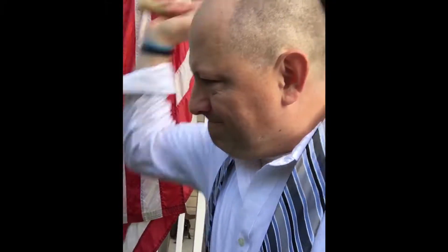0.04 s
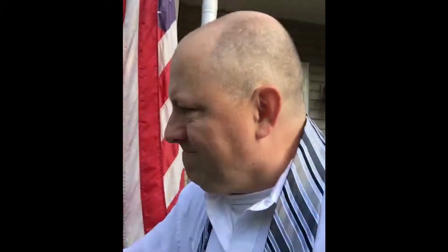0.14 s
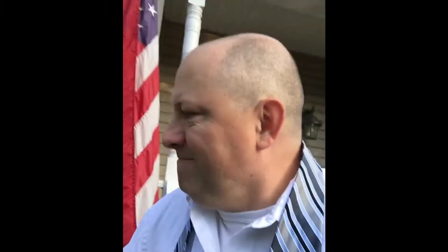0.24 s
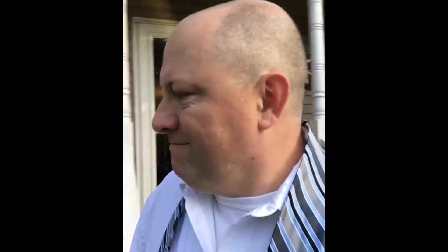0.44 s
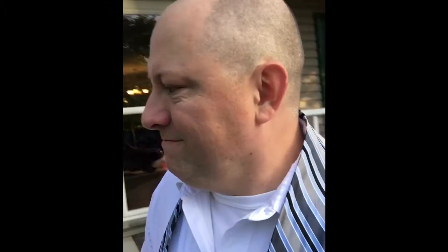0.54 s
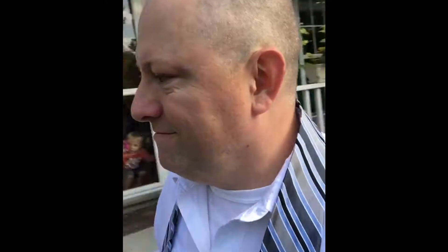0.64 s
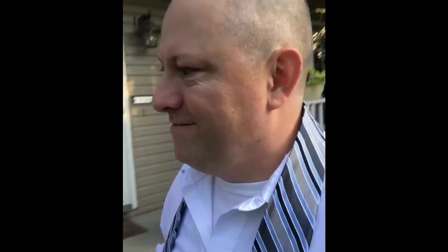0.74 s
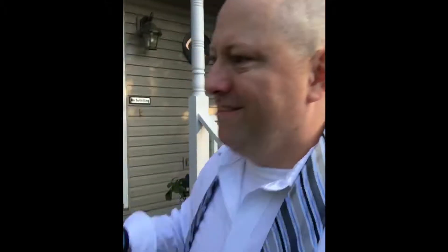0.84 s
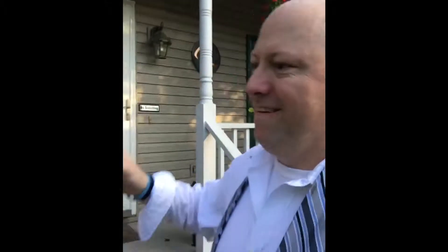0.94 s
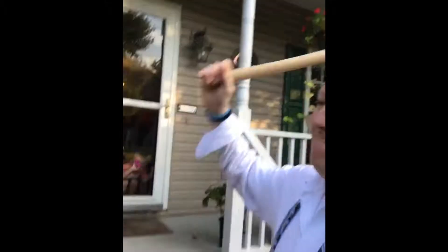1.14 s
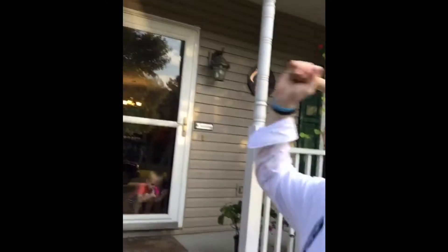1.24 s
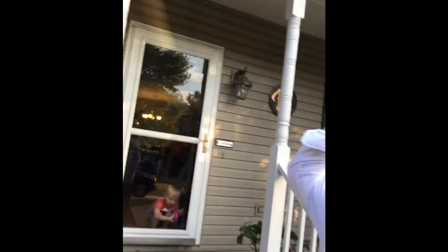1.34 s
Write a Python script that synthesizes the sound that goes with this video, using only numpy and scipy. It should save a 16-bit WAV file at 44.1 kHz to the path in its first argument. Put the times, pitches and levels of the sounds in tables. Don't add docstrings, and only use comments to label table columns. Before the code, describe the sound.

A wooden handle smacks a metal canister with a ringing crack and gas burst, crickets behind

```python
import sys
import numpy as np
from scipy import signal
from scipy.io import wavfile
from scipy.ndimage import uniform_filter1d

SR = 44100
rng = np.random.default_rng(int(sys.argv[2]) if len(sys.argv) > 2 else 0)


def store_pcm(level_fs):
    pcm = np.round(np.clip(level_fs, -1, 1) * 32767).astype(np.int16)
    wavfile.write(sys.argv[1], SR, np.atleast_2d(pcm).T)


def volts(x):
    e = np.asarray(x, float) / 20
    return 10 ** e


N = 61739
BLOW_S = 0.2148


def evened(x):
    return x / np.sqrt(np.mean(x ** 2) + 1e-20)


def colour(x, points):
    curve_hz, curve_db = np.transpose(points)
    hz = np.abs(np.fft.fftfreq(8192, 1 / SR))
    log_gain = np.interp(np.log(hz + 1), np.log(curve_hz + 1), curve_db) * np.log(10) / 20
    taps = np.fft.ifft(np.exp(np.conj(signal.hilbert(log_gain)))).real[:4096]
    return signal.oaconvolve(x, taps / np.linalg.norm(taps))[:len(x)]


def resonate(x, hz, width):
    r = np.exp(-np.pi * width / SR)
    return signal.lfilter([1, 0, -1], [1, -2 * r * np.cos(2 * np.pi * hz / SR), r * r], x)


def add(mix, s, sound):
    part = mix[max(round(s * SR), 0):][:len(sound)]
    part += sound[:len(part)]


def burst(start, rise, hold, t60):
    t = np.arange(N) / SR - start
    return np.clip(t / rise, 0, 1) * volts(-60 * np.maximum(t - rise - hold, 0) / t60)


def crackle(per_s, spread_db):
    chance = rng.random(N)
    size = rng.exponential(1, N)
    sign = rng.choice([-1., 1.], N)
    return evened((chance < per_s / SR) * sign * volts(spread_db * np.minimum(size, 4)))


def flutter(smooth_s, depth_db):
    width = int(smooth_s * SR)
    drift = uniform_filter1d(uniform_filter1d(rng.standard_normal(N), width), width)
    return volts(depth_db * evened(drift))


def cricket():
    singles = [.0, 0.058, 0.121, 0.137, .196, 0.809, 0.831, .977, .997, 1.122, 1.353]
    pairs = [0.022, 0.08, 0.154, .328, 0.38, 0.433, 0.471, 0.621, 0.715, .903, 0.944, 1.146, 1.184, 1.219,
             1.258, 1.373]
    triples = [0.509, 0.566, 0.662, 0.751, 0.851, 1.016, 1.071, 1.301]
    # time_s, level_db
    loudness = [(0, -55), (.2, -55), (.5, -54), (.6, -50), (.72, -48.5), (.8, -54), (1.1, -53), (1.4, -54)]
    stroke_s, stroke_gap_s, stroke_spread_db = .011, .0165, 1.3
    top_hz, slide_hz = 7480, 760
    chorus_hz, chorus_width_hz, chorus_db = 7180, 1430, -56.5

    out = np.zeros(N)
    t = np.arange(0, stroke_s, 1 / SR)
    shape = np.sin(np.pi * (t / stroke_s) ** 0.9) ** 2
    starts = []
    for strokes, groups in enumerate([singles, pairs, triples], 1):
        starts += [s + k * stroke_gap_s for s in groups for k in range(strokes)]
    for s, (a, b, c) in zip(starts, rng.standard_normal((len(starts), 3))):
        hz = top_hz + 60 * a - slide_hz * t / stroke_s
        tone = np.sin(2 * np.pi * (np.cumsum(hz) / SR + c))
        add(out, s - .0012, shape * volts(stroke_spread_db * b) * tone)
    out *= 2 * volts(np.interp(np.arange(N) / SR, *np.transpose(loudness)))

    far = rng.standard_normal(N)
    for _ in range(3):
        far = resonate(far, chorus_hz, chorus_width_hz)
    leaves = rng.standard_normal(1300) * volts(-60 * np.arange(1300) / SR / .04)
    blur = signal.oaconvolve(out, leaves / np.linalg.norm(leaves))[:N] / np.sqrt(10)
    return out + blur + volts(chorus_db) * evened(far)


def evening():
    # pitch_hz, level_db (per Hz)
    rumble_tone = [(11, -26), (18, -12.5), (43, 8), (92, -6.5), (124, -3.5), (194, -18), (239, -15.5),
                   (500, -28.5), (650, -74), (1100, -120)]
    air_tone = [(180, -23), (300, -18.5), (1000, -7), (2610, -9), (4700, -13.5), (5800, -32), (7080, -12),
                (8300, -10), (9390, -70), (11100, -16.5), (16000, -16)]
    rumble_db, air_db = -53, -61.5
    wind = evened(colour(rng.standard_normal(N), rumble_tone + [(900, -69)])) * flutter(0.051, 1.0)
    air = evened(colour(rng.standard_normal(N), air_tone))
    return volts(rumble_db) * wind + volts(air_db) * air


def grip():
    # start_s, peak_db, brightness (dB per octave)
    snaps = [
        (.0761, -27.5, 3.5),
        (.12155, -17, 0),
        (.1274, -27, 10),
        (.1304, -34, 2),
    ]
    # pitch_hz, level_db, t60_s
    grip_tones = [(1870, -10, .008), (2620, 0, .0075), (2950, -8, .006), (4200, -6, .007), (5600, -8, .003),
                  (7200, -8, .003), (12000, -15, .002)]
    out = np.zeros(N)
    t = np.arange(1500) / SR
    spreads = rng.standard_normal((len(snaps), 2 * len(grip_tones)))
    grits = rng.standard_normal((len(snaps), len(t)))
    for (s, db, tilt), spread, grit in zip(snaps, spreads, grits):
        ring = np.zeros(len(t))
        for (hz, level_db, t60), a, b in zip(grip_tones, spread[::2], spread[1::2]):
            fade = volts(level_db + tilt * np.log2(hz / 2600) + a - 60 * t / t60)
            ring += fade * np.cos(2 * np.pi * hz * (1 + .01 * b) * t - .5)
        tail_tone = [(1000, -20), (2600, 0), (4000, tilt - 4), (13000, 2 * tilt - 8)]
        tail = volts(-25 - 60 * t / .03) * colour(grit, tail_tone)
        add(out, s, volts(db) * (ring / np.abs(ring).max() + tail))
    return signal.lfilter(*signal.butter(3, 1400, 'high', fs=SR), out)


def swing():
    # time_s, pitch_hz, hum_db, swish_db
    path = [
        (.135, 108.9, -92, -60),
        (0.161, 110, -34, -56),
        (.167, 112, -58, -50),
        (0.175, 106, -30, -43),
        (0.201, 141.3, -30, -45),
        (0.219, 127.6, -42.5, -29),
        (0.226, 139, -33.5, -34),
        (0.244, 130, -108, -73),
    ]
    # pitch_hz, level_db (per Hz)
    swish_tone = [(290, -4), (500, -3), (740, -7), (2730, -4.5), (6230, -17.5), (7000, -17), (16000, -17.5)]
    s, hz, hum_db, swish_db = np.transpose(path)
    t = np.arange(N) / SR
    turns = np.cumsum(np.interp(t, s, hz)) / SR + 0.33
    hum = np.sin(2 * np.pi * turns) + volts(-22.5) * np.sin(4 * np.pi * turns + 1.2)
    swish = colour(rng.standard_normal(N) * flutter(.002, 1.), swish_tone)
    hum_level = volts(np.interp(t, s, hum_db, -120, -120))
    swish_level = volts(np.interp(t, s, swish_db, -120, -120))
    return 2 ** .5 * hum * hum_level + swish * swish_level


def smack():
    # pitch_hz, level_db
    split_tone = [(400, -23), (1500, 8.5), (4500, 6), (7000, -14), (12000, 10.5), (16000, 7.5)]
    # pitch_hz, level_db (per Hz)
    jet_tone = [(88, -33), (150, -39), (1450, -9), (1630, -1.5), (1940, -9), (2600, -2), (3300, -9),
                (4300, -6), (6510, -12.5), (13400, -10.5), (16000, -17)]
    echo_tone = [(180, -74.5), (300, -14), (667, -12), (737, -17), (994, -9), (2500, 3), (3300, -3.5),
                 (4400, 1), (5300, -13), (13800, -10), (16000, -3)]
    # pitch_hz, width_hz, level_db
    body = [(1017, 37, -31.5), (1850, 46, -37), (2210, 71, -29), (2650, 97, -40.5), (2865, 150, -28),
            (3880, 110, -35), (4100, 200, -28.5), (278, 120, -37), (664, 110, -44.5)]
    # middle_s, length_s, pitch_hz, level_db
    returns = [
        (.395, .04, 1000, -55),
        (.445, .05, 995, -50),
        (.515, .05, 1010, -56),
        (.505, .05, 1570, -50),
    ]
    split_s, split_db, jet_db, echo_db = 0.208, -21, -17.5, -29

    split = colour(rng.standard_normal(N) * burst(split_s, 0.00094, 0.002, 0.24), split_tone)
    gas = rng.standard_normal(N) * flutter(0.00047, 0.86)
    jet = colour(gas * burst(BLOW_S - .002, rise=0.0075, hold=0.016, t60=0.27), jet_tone)

    force = crackle(2500, 2.5) * burst(BLOW_S, .0008, .016, .07)
    add(force, BLOW_S, 8 * np.hanning(7)[1:-1])
    ring = np.zeros(N)
    for hz, width, db in body:
        ring += volts(db) * resonate(force, hz, width) * np.sqrt(width / SR * 3)

    echo = colour(rng.standard_normal(N) * flutter(0.016, 1.0), echo_tone)
    echo = echo * burst(BLOW_S, 0.014, 0.007, t60=1)
    for s, length, hz, db in returns:
        t = np.arange(0, length, 1 / SR)
        swell = np.sin(np.pi * t / length) ** 2
        add(ring, s - length / 2, volts(db) * swell * np.sin(2 * np.pi * hz * t))
    return volts(split_db) * split + volts(jet_db) * jet + ring + volts(echo_db) * echo


def wall():
    # start_s, hold_s, pitch_hz, level_db, t60_s
    wall_tones = [
        (.2165, .008, 1575, -16, .05),
        (.2095, .024, 4595, -23.5, .045),
        (.231, .006, 2640, -25, .05),
    ]
    out = np.zeros(N)
    for s, hold, hz, db, t60 in wall_tones:
        tone = np.sin(2 * np.pi * np.cumsum(hz * flutter(.004, .08)) / SR)
        out += volts(db) * burst(s, .004, hold, t60) * tone
    return out


def fizz():
    # pitch_hz, level_db (per Hz)
    foam_tone = [(180, -78), (300, -23), (1720, -5.5), (2650, -0.5), (2790, -3.5), (3470, -5),
                 (12400, -2.5), (14700, -4.5), (16500, -14.5)]
    fizz_db, sag_db_per_s = -44, -2.5
    smooth = 0.63
    since_blow = np.arange(N) / SR - BLOW_S
    foam = smooth * rng.standard_normal(N) + (1 - smooth) * crackle(per_s=5000, spread_db=6.5)
    level = np.clip(since_blow / 0.019, 0, 1) * volts(fizz_db + sag_db_per_s * since_blow)
    return evened(colour(foam, foam_tone)) * level * flutter(0.019, 1.0)


def handle():
    # start_s, peak_db, pitch_hz, width_hz
    ticks = [(0.777, -35, 2640, 1500), (0.8285, -35.5, 1600, 890), (.8875, -37, 4500, 3000),
             (.943, -37, 3000, 2500), (1.0105, -37, 2350, 1200), (1.0525, -37, 2680, 1500),
             (1.0735, -35, 1900, 700), (1.1335, -29, 8000, 5000), (1.144, -40, 2220, 1000),
             (1.185, -40, 2120, 1500), (1.207, -33, 2080, 1200), (1.2064, -34.5, 4300, 1500),
             (1.213, -44, 2300, 1500)]
    # start_s, peak_db, pitch_hz, t60_s
    knocks = [(0.224, -29.5, 38.3, 0.19), (0.249, -31, 162, 0.05), (0.262, -44.5, 290.5, 0.23),
              (0.647, -46, 218, 0.044), (1.0373, -32.5, 256, 0.055), (1.045, -41.5, 469, 0.14),
              (1.0535, -36, 714, 0.053), (1.0557, -32.5, 190, 0.037), (1.058, -39, 880, 0.032),
              (1.063, -49, 44, 0.15), (1.064, -61, 229, 0.018), (1.0655, -29, 717, 0.012),
              (1.075, -44, 715, 0.034), (1.089, -45.5, 120, 0.095), (1.094, -53, 724, 0.036),
              (1.112, -58, 720, 0.036)]
    out = np.zeros(N)
    t = np.arange(SR // 4) / SR
    for (s, db, hz, width), grit in zip(ticks, rng.standard_normal((len(ticks), 600))):
        drive = grit * (volts(-60 * t[:600] / 0.0015) + volts(-19 - 60 * t[:600] / 0.035))
        tick = resonate(resonate(drive, hz, width), hz, 2 * width) + 0.21 * np.diff(drive, prepend=0)
        add(out, s, volts(db) * tick / np.abs(tick).max())
    for s, db, hz, t60 in knocks:
        shape = volts(db - 60 * t / t60) * np.minimum(t / 0.00074, 1)
        add(out, s, shape * np.sin(2 * np.pi * hz * t))
    return out


def bubbles():
    out = np.zeros(N)
    t = np.arange(300) / SR
    for hz in np.geomspace(1500, 6000, 10):
        blip = np.sin(2 * np.pi * hz * t) * volts(-60 * t * hz / 25) * np.minimum(t / 0.00049, 1)
        out += signal.oaconvolve(crackle(30, 2.8), blip)[:N]
    return volts(-62) * evened(out) * (np.arange(N) / SR > .3)


def rustles():
    # middle_s, length_s, pitch_hz, level_db
    puffs = [(0.788, .012, 5500, -52), (0.816, .02, 2100, -56), (.833, .014, 6030, -48),
             (0.842, 0.014, 1700, -58), (.8885, 0.0053, 4500, -58), (0.899, .012, 9500, -47),
             (0.927, 0.017, 2400, -49), (0.927, 0.017, 4700, -52), (.953, 0.01, 9600, -47),
             (0.989, 0.026, 2760, -51), (1.057, 0.026, 10200, -43.5), (1.075, .018, 8900, -46),
             (1.145, 0.033, 2380, -56), (1.283, 0.027, 2260, -54.5), (1.297, 0.022, 4400, -58)]
    out = np.zeros(N)
    for (s, length, hz, db), grit in zip(puffs, rng.standard_normal((len(puffs), 2000))):
        t = np.arange(0, length, 1 / SR)
        grain = grit * np.abs(grit)
        band = resonate(resonate(grain, hz, hz * .45), hz, hz * .45)[:len(t)]
        add(out, s - length / 2, volts(db) * evened(band) * np.sin(np.pi * t / length))
    return out


def scuff():
    # pitch_hz, level_db
    scuff_tone = [(100, -10), (250, 0), (450, -4), (750, -3), (1100, -15), (2500, -25), (12000, -29),
                  (16000, -36)]
    shape = burst(start=1.04, rise=0.0028, hold=0.0072, t60=0.15)
    return volts(-47) * evened(colour(crackle(1500, 3.0), scuff_tone)) * shape


def scene():
    background = cricket() + evening()
    blow = grip() + swing() + smack() + wall()
    aftermath = fizz() + handle() + bubbles() + rustles() + scuff()
    return (background + blow + aftermath)[None]


def treble_gaps(x):
    # pitch_hz, margin (spreads of chance)
    safety = [(7500, 4.5), (8200, 3.), (9500, 3.6), (10300, 1.5), (11200, 3.3), (13500, 1.7), (14500, 1.7),
              (15700, 0)]
    # time_s, shortage (spreads of chance)
    shortage = [(0, 1.6), (.12, 1.4), (.19, -3), (.6, -1.5), (.75, 1.1), (1.4, 1.3)]
    hz, t, z = signal.stft(x, SR, nperseg=2048)
    band = np.arange(len(hz)) // 12
    chance = rng.standard_normal((len(t), band[-1] + 1))
    luck = evened(uniform_filter1d(chance, size=3, axis=0))[:, band].T
    margin = np.interp(hz, *np.transpose(safety), 9)[:, None] - np.interp(t, *np.transpose(shortage))
    gain = np.where(luck + margin < 0, .01, 1)
    return signal.istft(z * gain, SR, nperseg=2048)[1][:, :N]


def low_pass(x):
    return signal.sosfilt(signal.butter(12, 16970, fs=SR, output="sos"), x)


def record(dry):
    soft = .7 * np.tanh(dry / .7)
    edge = signal.firwin(511, 15950, window=("kaiser", 9), fs=SR)[None]
    mix = treble_gaps(signal.oaconvolve(soft, edge, "same"))
    return low_pass(mix)


dry = scene()
out = record(dry)
store_pcm(out)
```